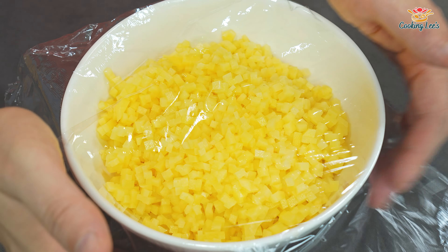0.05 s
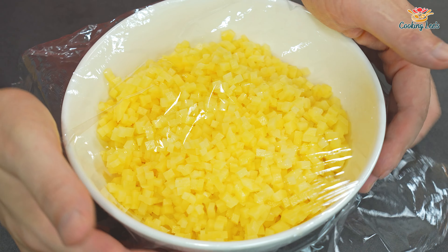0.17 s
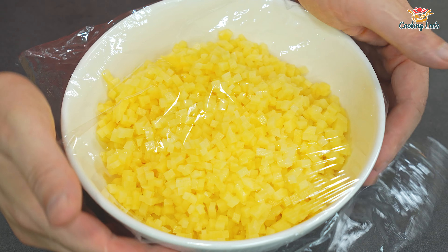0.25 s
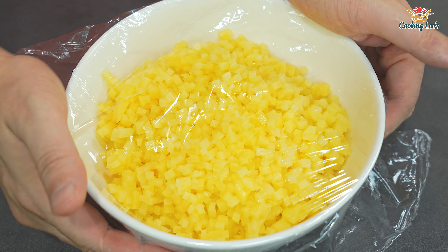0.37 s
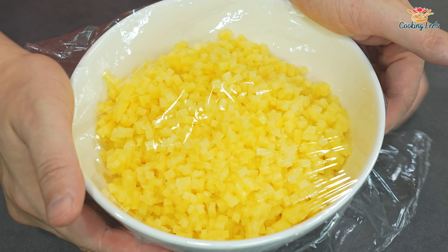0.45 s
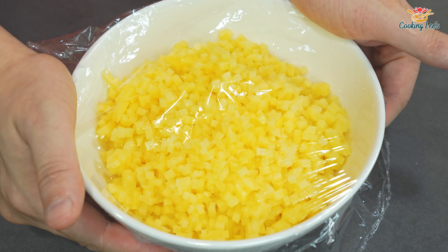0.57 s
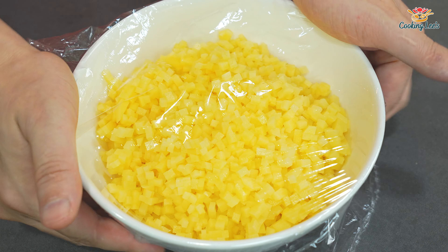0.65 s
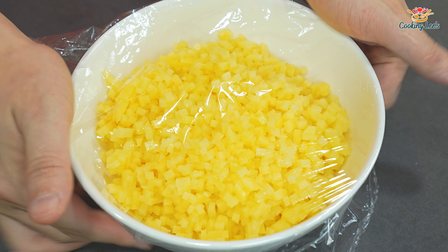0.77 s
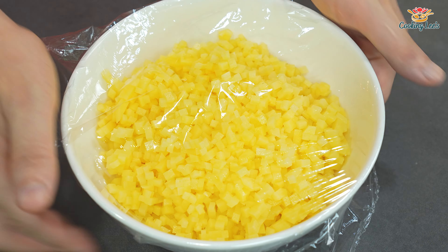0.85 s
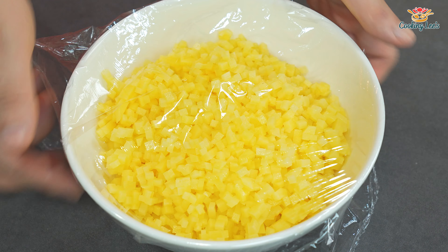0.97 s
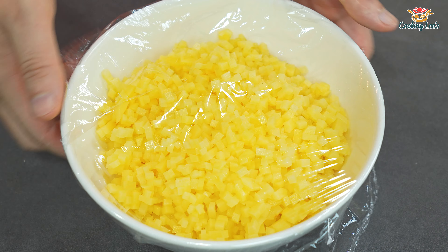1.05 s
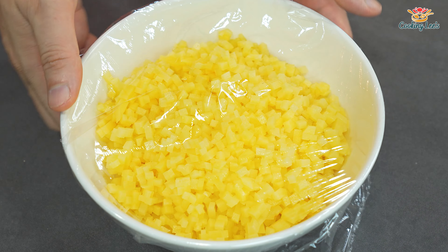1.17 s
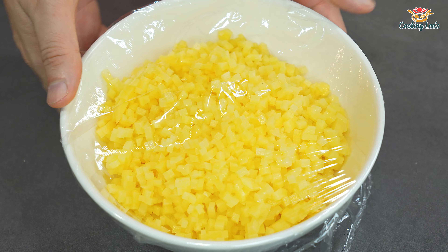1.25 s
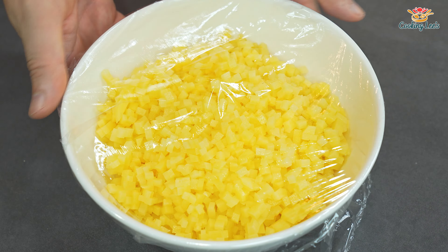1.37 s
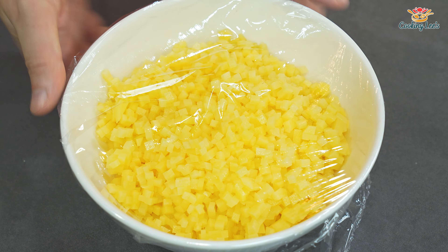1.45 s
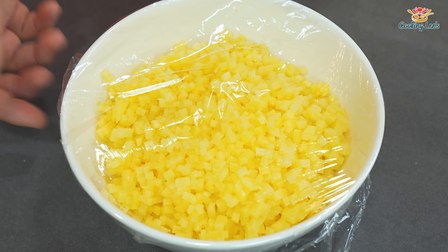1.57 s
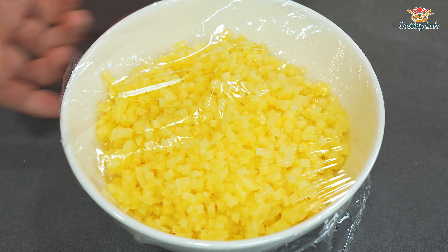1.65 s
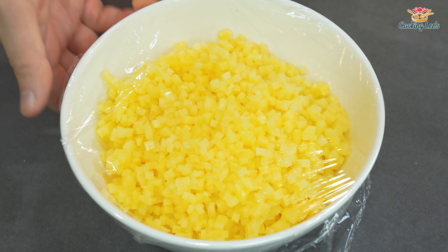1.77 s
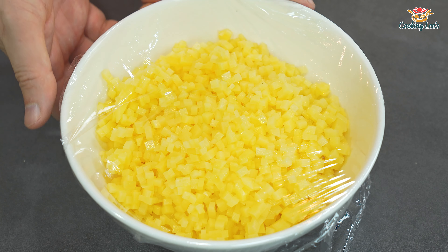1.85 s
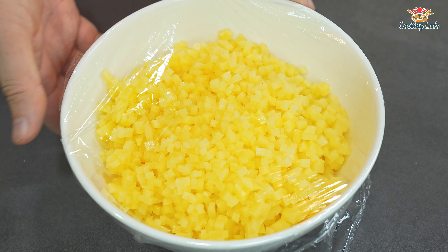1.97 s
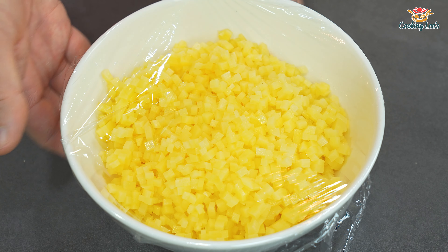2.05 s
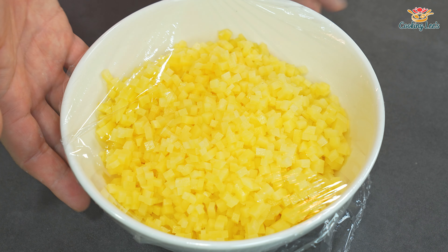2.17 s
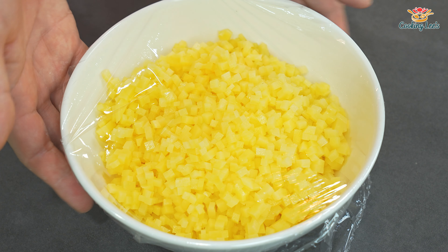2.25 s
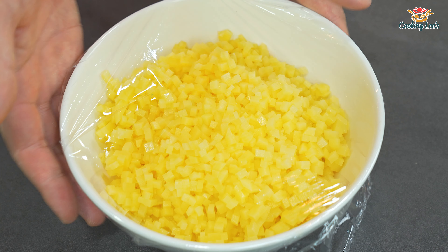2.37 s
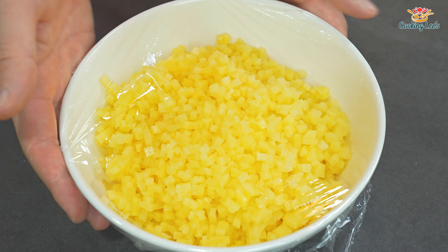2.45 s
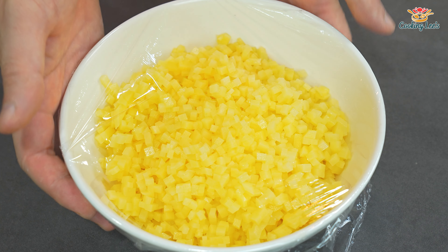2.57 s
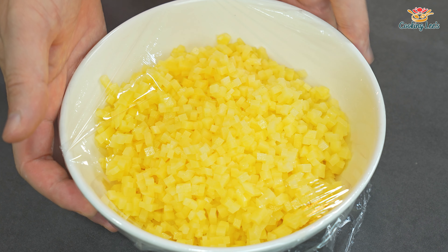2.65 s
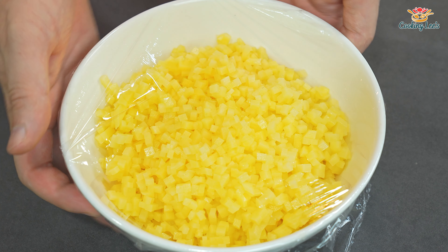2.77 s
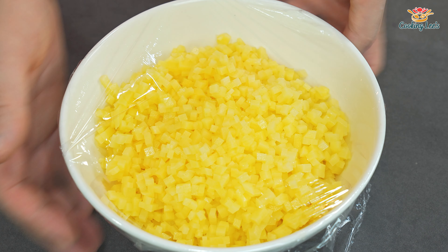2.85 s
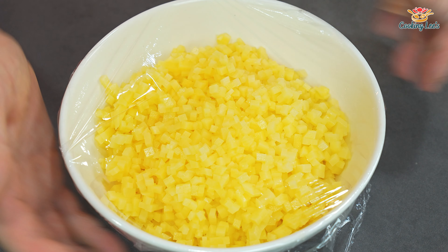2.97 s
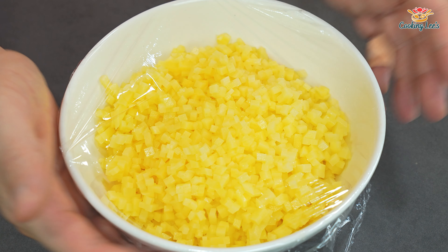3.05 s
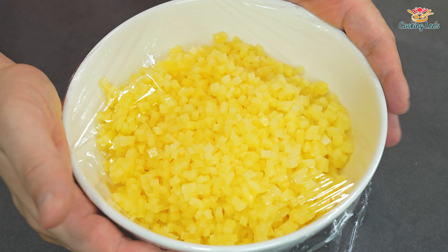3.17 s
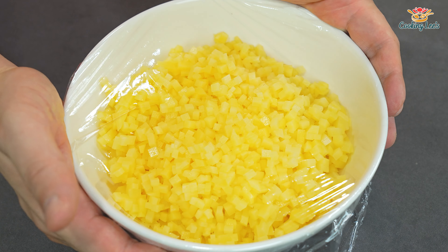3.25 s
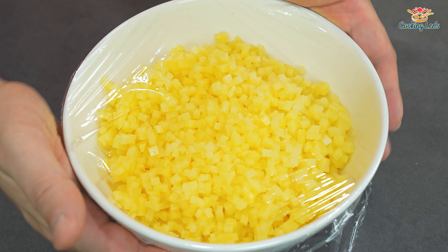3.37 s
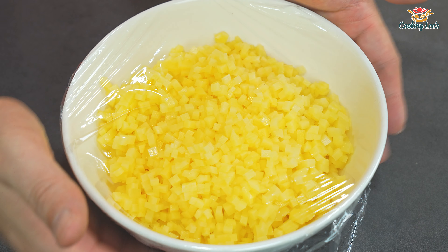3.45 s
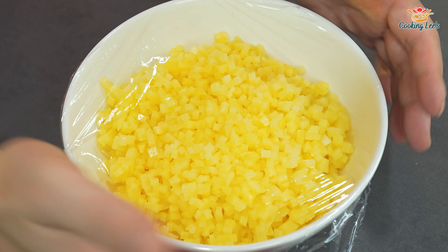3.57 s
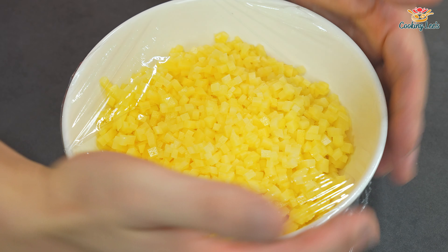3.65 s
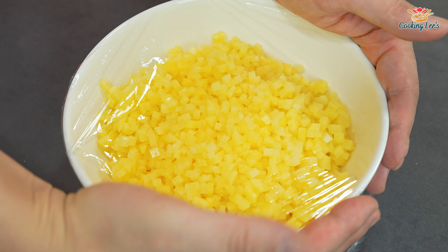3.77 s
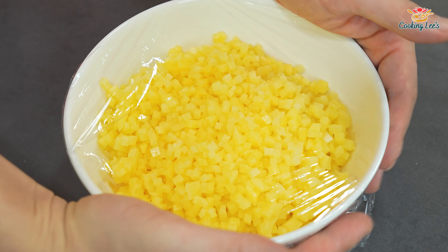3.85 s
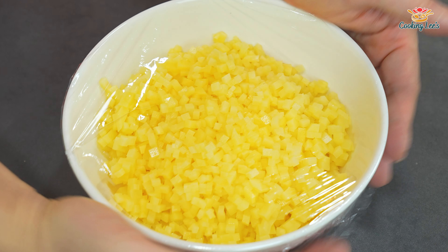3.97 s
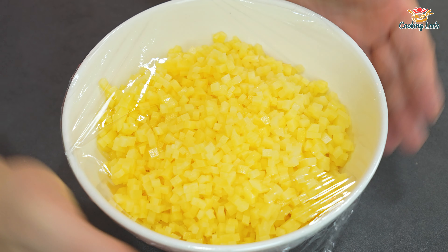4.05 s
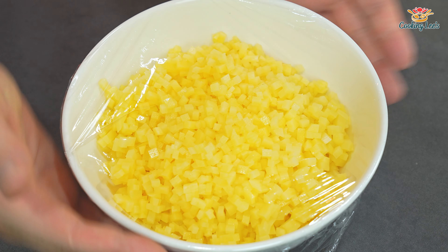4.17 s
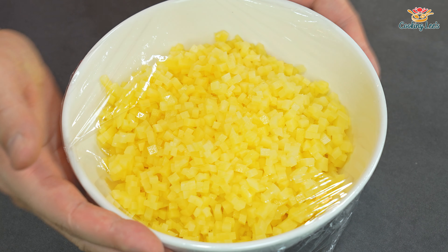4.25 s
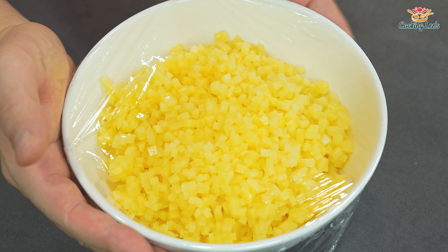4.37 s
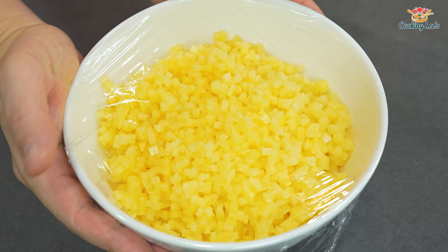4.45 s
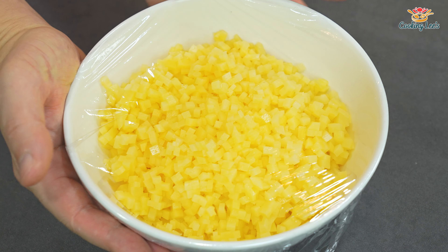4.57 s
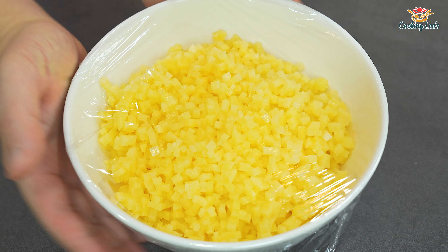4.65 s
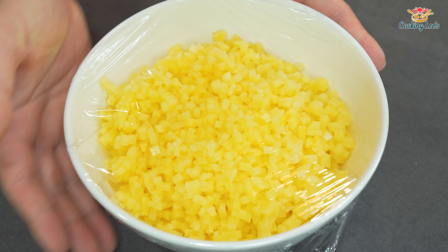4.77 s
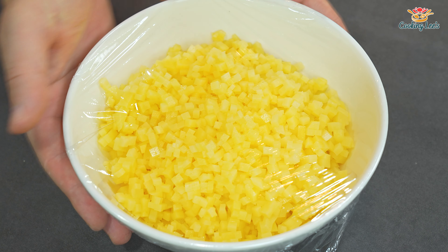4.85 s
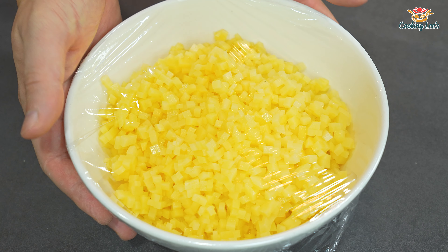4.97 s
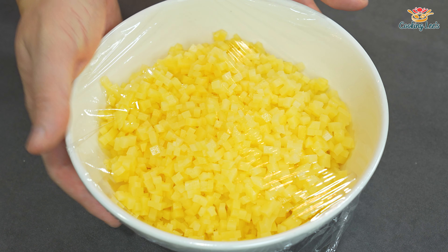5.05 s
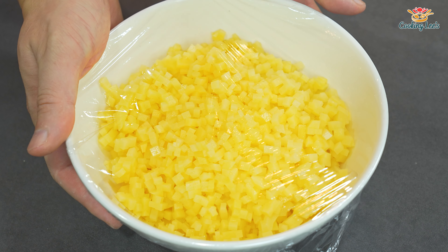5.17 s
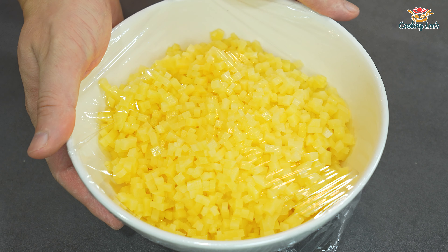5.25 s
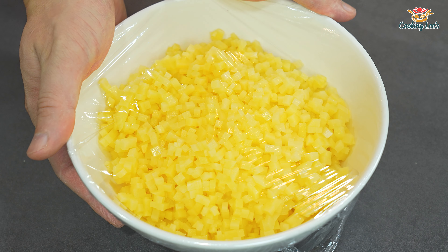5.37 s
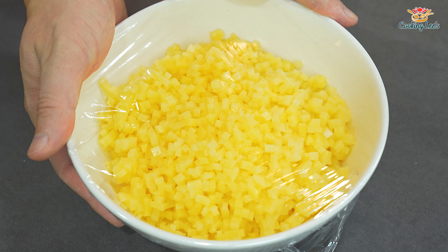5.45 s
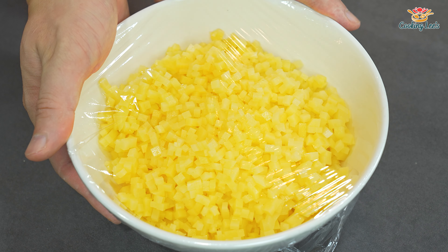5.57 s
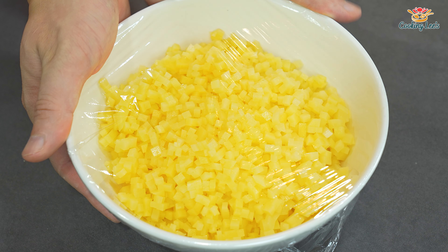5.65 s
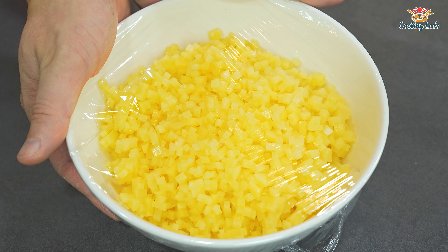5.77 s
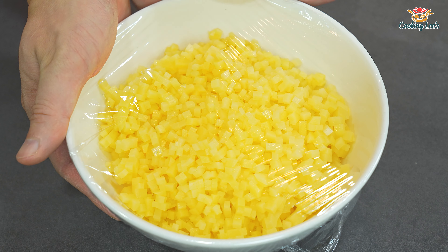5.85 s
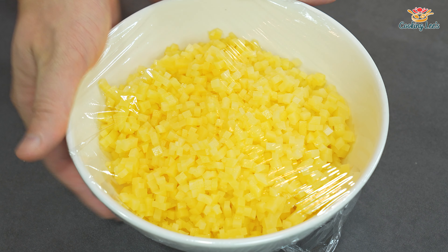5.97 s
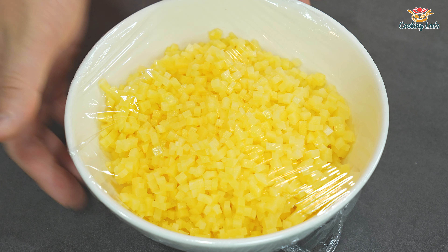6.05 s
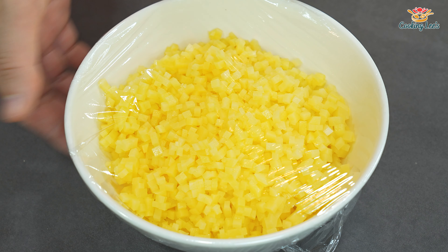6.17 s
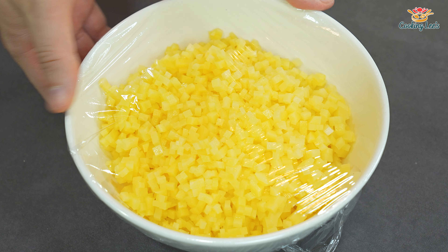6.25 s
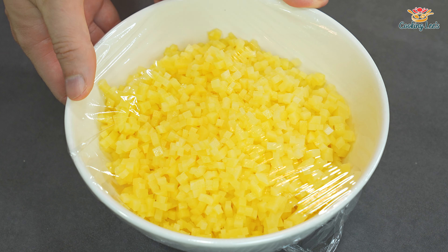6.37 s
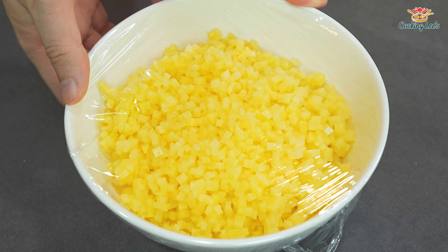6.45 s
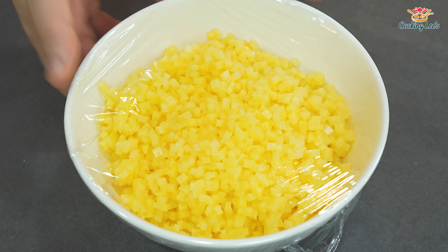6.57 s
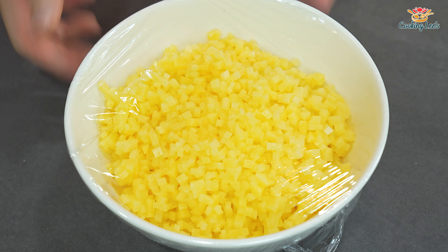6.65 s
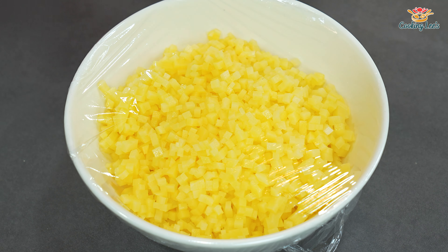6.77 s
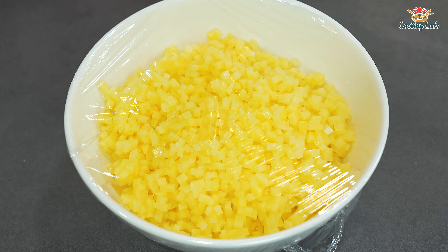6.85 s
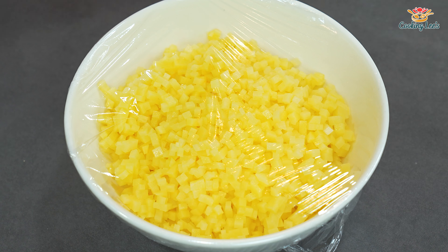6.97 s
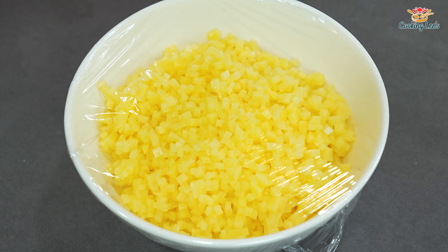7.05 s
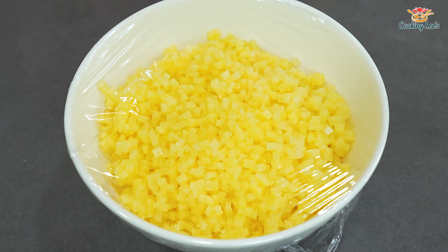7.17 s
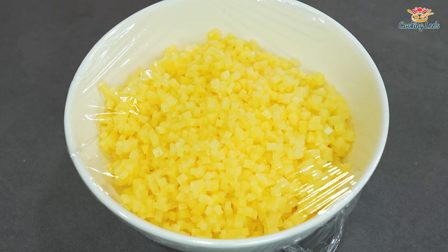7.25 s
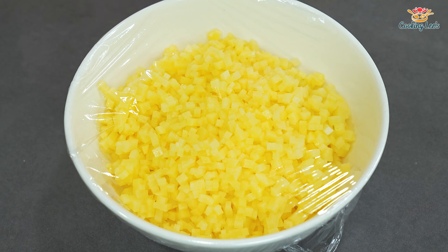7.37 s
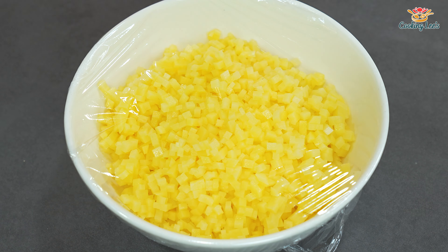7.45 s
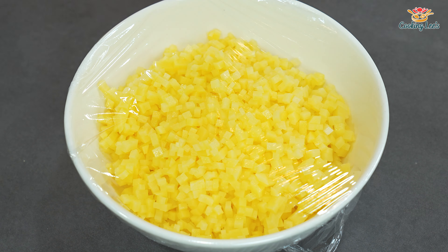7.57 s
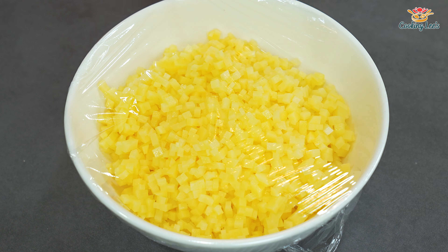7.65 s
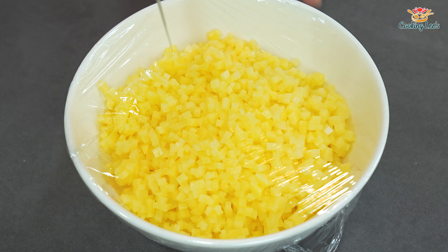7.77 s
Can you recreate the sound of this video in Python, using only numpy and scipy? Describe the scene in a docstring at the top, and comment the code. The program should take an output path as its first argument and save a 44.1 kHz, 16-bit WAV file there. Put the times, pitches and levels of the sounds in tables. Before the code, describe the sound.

A close microphone in a small room catches cling film being pressed round a ceramic bowl. From 0.1 to 0.75 seconds sharp snaps with tiny pitched rings crowd together over strong gritty rustling, while the bowl bumps and drags softly. Lighter crackles follow, with another cluster around 1.25 and a bright burst near 2.3. At about 2.45 dull thumps and a short slide shake the worktop. After a quieter stretch, a press at 2.9 and a brief one at 3.2 lead to busy, fizzy crackling from 3.4 to 4.1, with low knocks at 3.75 and 4.05. Smaller rustles and a dull crumple near 4.3 continue; crisp snaps stand out at 5.3 to 5.4 and 5.9. Soft crumpling comes at 6.1 and a last press at 6.65. Then almost nothing remains: faint hiss, thin wavering whistles after 7.25 and a trace of rustle near 7.75.

```python
"""Cling film snaps and rustles as hands press and smooth it round a ceramic bowl, close to a microphone. Snaps
are noise cracks with a short pitched ring; rustle is gritty noise through resonances of the film. Squeezed film
crumples dully; the bowl bumps and drags, shaking decaying modes of bowl and worktop. A small room answers the
snaps, and a noise suppressor darkens the quiet bands. At the end only faint hiss, brief thin tones and a little
rustle remain."""
import sys
import numpy as np
from scipy import signal
from scipy.fft import rfft, irfft, next_fast_len
from scipy.io import wavfile
from scipy.ndimage import uniform_filter1d, map_coordinates

SR = 44100
rng = np.random.default_rng(int(sys.argv[2]) if len(sys.argv) > 2 else 0)


def master(y):
    """Save y as 16-bit WAV."""
    cut = np.clip(np.atleast_2d(y).T, -1, 1)
    pcm = np.round(cut * 32767)  # scale
    wavfile.write(sys.argv[1], SR, pcm.astype(np.int16))


N = 344421


def snaps():
    """Each crease cracks, and the freed patch of film rings roughly at its own pitch while the crease runs."""
    # the loudest creases letting go, peaks before the bass cut below:
    # start_s [s], patch_db [dB peak], pitch_hz [Hz], crack_db [dB peak], length_ms [ms]
    loud_creases = [(.0941, -54, 1730, -27.5, 1.7), (.1143, -37.5, 3690, -17.5, 1.3),
                    (.1379, -13.5, 2200, -12.5, 4.4), (.1539, -15.5, 1880, -7.5, 3.4),
                    (.1852, -31.5, 1150, -17.5, 1.2), (.2129, -9, 1750, -17, 1.46),
                    (.2981, -15.5, 1940, -15.5, 1), (.3364, -13, 3220, -9.5, 0.72),
                    (.3438, -20, 2300, -17, 3.1), (.3964, -12, 2770, -9.5, 1.16),
                    (.4274, -17.5, 2200, -19, 2), (.439, -24, 3830, -21, 3), (.5818, -32, 4170, -32, 4),
                    (.5976, -29.5, 1030, -33.5, 5.3), (.6413, -22.5, 930, -31.5, 5.2),
                    (.6485, -34, 2610, -18.5, 2), (.6539, -19.5, 2040, -14, 1.6),
                    (.6879, -12.5, 2740, -13, 1.43), (.7139, -42, 2230, -19, 1.2),
                    (.7184, -31, 2380, -19, 3.6), (.7522, -28, 3430, -19, 2), (.8397, -30, 2880, -27, 1.9),
                    (.8848, -21, 1420, -29, 10.3), (.8907, -16.5, 1480, -30, 7),
                    (.9658, -28, 2460, -31, 3.7), (1.0777, -44, 2570, -28.5, 5.1),
                    (1.1496, -32, 1990, -29.5, 4.1), (1.1591, -26.5, 2370, -31.5, 1.5),
                    (1.1873, -44, 2350, -32.5, 6.3), (1.2117, -31, 2470, -22, 4.5),
                    (1.2332, -22, 2500, -30, 3.1), (1.2378, -16.5, 1500, -26, 2.2),
                    (1.25, -17, 1700, -19, 3.1), (1.2596, -12, 1330, -21, 3.2),
                    (1.298, -8, 1740, -23, 0.77), (1.4049, -29, 1540, -24.5, 1.2),
                    (1.422, -39, 1980, -33, 3.1), (1.431, -28, 1140, -36, 3.1),
                    (1.4837, -26, 2940, -27, 3.5), (1.521, -28, 3720, -44, 5.9),
                    (1.7476, -30, 1340, -44.5, 3), (1.7988, -21.5, 925, -30.5, 1.7),
                    (1.8244, -23, 2600, -42, 1.7), (1.8806, -33, 2130, -31, 1.5),
                    (1.8885, -26.5, 2380, -37, 1.5), (1.9302, -12, 2370, -20, 2.9),
                    (1.9466, -22.5, 3470, -23.5, 1.7), (2.0199, -26.5, 2440, -39, 3.4),
                    (2.0262, -22.5, 2790, -34, 1.4), (2.0413, -19.5, 1770, -30, 1),
                    (2.0749, -24, 1940, -36.5, 2.9), (2.0799, -22, 2900, -40, 1.7),
                    (2.0945, -17, 2800, -31.5, 1.4), (2.1275, -17, 3480, -19, 3.5),
                    (2.2088, -26, 3690, -26.5, 5.3), (2.2329, -22.5, 2780, -15, 6.7),
                    (2.2407, -22.5, 2830, -24.5, 1.5), (2.2749, -12, 2770, -13.5, 1.67),
                    (2.2906, -19.5, 3370, -25, 4.4), (2.3058, -25, 3370, -29, 1.2),
                    (2.4854, -32, 1220, -35, 1.6), (2.6223, -40, 3100, -32, 2.3),
                    (2.6732, -40, 1180, -28.5, 1.4), (2.7069, -33, 2770, -29, 14),
                    (2.7173, -25.5, 3200, -27, 1.5), (2.7373, -46, 3960, -29.5, 2.5),
                    (3.1886, -26, 1750, -22.5, 7.8), (3.4342, -35, 3380, -27, 3.1),
                    (3.4578, -21, 3760, -15.5, 1.1), (3.4673, -34, 4200, -15, 3),
                    (3.4983, -28.5, 1510, -33, 9.9), (3.5331, -23.5, 3500, -21.5, 2.7),
                    (3.5466, -22, 1390, -23, 3.2), (3.7141, -40, 2840, -26, 1.8),
                    (3.7284, -28, 3260, -14, 4.7), (3.7518, -26, 2400, -21, 4.1),
                    (3.8232, -20, 3400, -16.5, 2.6), (3.8351, -21.5, 3360, -25, 13),
                    (3.845, -22, 3570, -33.5, 2.5), (3.8571, -27, 3420, -34, 4.3),
                    (3.8751, -16, 2650, -17.5, 1.5), (3.9242, -34, 3100, -15.5, 6.9),
                    (3.9834, -30.5, 3790, -21.5, 12), (4.0215, -24, 2240, -16, 1.2),
                    (4.0345, -23.5, 3300, -28, 1.7), (4.325, -50, 1850, -19, 2.1),
                    (4.4249, -30, 2920, -23.5, 0.93), (4.5607, -51, 3530, -19.5, 1.7),
                    (4.6016, -33, 3500, -27, 3), (4.6182, -33, 3040, -28, 1), (4.6601, -23, 2470, -35, 1.4),
                    (4.9617, -38.5, 2610, -38, 2.5), (5.021, -33, 2940, -51, 12),
                    (5.0778, -34, 2900, -21, 3.3), (5.124, -37.5, 1550, -41, 5.2),
                    (5.2988, -20, 3420, -25.5, 1.1), (5.3032, -9, 3320, -17, 1.7),
                    (5.3109, -16, 3840, -27, 0.62), (5.3485, -15, 3660, -32, 1.3),
                    (5.3533, -18, 1870, -23.5, 1.7), (5.4183, -15, 1590, -13, 1.2),
                    (5.5676, -45, 2170, -42, 2.5), (5.5914, -32, 1700, -32, 0.78),
                    (5.6572, -37, 2600, -37, 3.8), (5.6653, -32.5, 2310, -30.5, 3.4),
                    (5.8902, -23, 2050, -20, 1.3), (5.9055, -22.5, 1880, -36, 0.61),
                    (5.911, -22.5, 2300, -31, 1.1), (5.9203, -17.5, 2100, -17, 1.2),
                    (6.0141, -34, 1970, -27.5, 3.9), (6.2698, -37, 2470, -26.5, 1.5),
                    (6.2876, -37, 2930, -32, 2.4), (6.3885, -25.5, 1660, -26.5, 1.9),
                    (6.5577, -43.5, 3000, -35.5, 2.2), (6.607, -38.5, 1620, -30, 1.5),
                    (6.6378, -25, 1490, -32, 1.7), (6.658, -32, 2000, -34, 1.4)]
    creases = list(loud_creases) + small_creases(count=130)
    out = np.zeros(N + SR)
    t = np.arange(SR // 20) / SR
    draws = rng.standard_normal((len(creases), 2, len(t)))
    for crease, (patch_noise, crack_noise) in zip(creases, draws):
        start_s, patch_db, pitch_hz, crack_db, length_ms = crease
        u = t / (max(length_ms, .4) * 0.00038)  # the swell peaks at 0.38 of the length
        fade = u * np.exp(1 - u)
        patch = signal.lfilter(*signal.iirpeak(pitch_hz, 2.8 + 0.45 * length_ms, SR), patch_noise)
        ring = fade * (0.66 * unit(patch) + .5 * np.sin(2 * np.pi * pitch_hz * t))
        crack = fade ** 2.3 * signal.lfilter(*signal.butter(2, 5000, "high", fs=SR), crack_noise)
        burst = amp(patch_db) * ring / np.abs(ring).max()
        burst += amp(crack_db) * crack / np.abs(crack).max()
        out[round(start_s * SR):][:len(t)] += burst
    return filtered(out[:N], lambda hz: hz ** 4 / (hz ** 4 + 650 ** 4))  # a small patch radiates no bass


def small_creases(count):
    """Lesser creases at chance moments, their strength scattered about the rustle around them."""
    over_rustle_db, scatter_db = 8.5, 4
    middle_hz, log_spread, length_ms = 2500, 0.24, 1.3
    loose, tight = handling()[:2]
    when = rng.uniform(0, N - 1, count).astype(int)
    chance = rng.standard_normal((count, 3))
    rustle_db = 20 * np.log10(np.hypot(loose, tight)[when])
    patch_db = rustle_db + over_rustle_db + scatter_db * chance[:, 0]
    crack_db = patch_db + scatter_db * chance[:, 1]
    pitch_hz = middle_hz * np.exp(log_spread * chance[:, 2])
    return list(zip(when / SR, patch_db, pitch_hz, crack_db, np.full(count, length_ms)))


def rustle():
    """Countless small creases: loose and stretched patches, fine peeling and the air trapped under the film."""
    # resonances of loose patches: pitch_hz [Hz], width_hz [Hz], level_db [dB, relative]
    slack = [(1406, 330, 1), (1504, 220, 2), (1926, 220, 3), (2235, 260, 1.5)]
    # resonances of stretched patches: pitch_hz [Hz], width_hz [Hz], level_db [dB, relative]
    taut = [(2446, 360, 2.5), (2929, 230, 3.5), (3314, 350, 5), (3620, 160, 5.5), (3970, 300, 2.5),
            (4850, 890, -2)]
    # resonances of air under the film: pitch_hz [Hz], width_hz [Hz], level_db [dB, relative]
    hollow = [(480, 150, -22.5), (633, 80, -12), (804, 110, -2), (901, 70, 6), (1033.7, 92, 7.5)]
    # spectrum of fine peeling: freq_hz [Hz], density_db [dB per Hz, relative]
    peeling = [(2350, -63.5), (4000, -5.5), (6740, 0), (7370, -1), (12300, -1), (14800, -1), (16000, -16.5),
               (16500, -36)]
    loose, tight, treble, air = handling()
    strongest = np.maximum(np.hypot(loose, tight), treble)
    busy = np.clip((20 * np.log10(strongest) + 79) / 35, 0, 1)  # faint rustle is distant, hence smooth
    slips = grit(spiky_db=1.1 * busy, clump_db=3.1 * busy)
    body = loose * unit(filtered(slips, modes(slack))) + tight * unit(filtered(slips, modes(taut)))
    fizz = treble * unit(filtered(slips, lambda hz: amp(along(peeling, hz))))
    low = air * unit(filtered(slips, modes(hollow)))
    narrow = shifting(body + low, depth_db=3.5, size=(3, 8))
    return shifting(narrow + fizz, depth_db=1.5, size=(30, 3))


def handling():
    """Gains of loose patches, stretched patches, peeling and trapped air: each press, then its slow settling."""
    # presses of a palm on the film, levels before the shifting resonances:
    # peak_s [s], rustle_db [dB rms], tightness_db [dB, stretched over loose patches], treble_db [dB rms],
    # low_db [dB rms], rise_s [s per 20 dB], fall_s [s per 20 dB]
    presses = [(.05, -59, -4.5, -54.5, -56, .04, 0.076), (.15, -33, 4, -40.5, -37.5, .035, 0.16),
               (.313, -27.5, 8.5, -31.5, -40.5, .09, 0.14), (.44, -42.5, 4, -46.5, -45, 0.16, 0.23),
               (.657, -38.5, 8, -42.5, -46.5, 0.026, 0.32), (.978, -47, 13, -53.5, -71, 0.074, .06),
               (1.159, -43, 0, -43.5, -57.5, .07, 0.1), (1.253, -45.5, 15, -54.5, -47, .06, 0.47),
               (1.427, -39.5, -1.5, -46, -48.5, 0.1, 0.028), (1.523, -44, -4.5, -50.5, -79, .1, 0.046),
               (1.735, -48, 1, -56.5, -50.5, 0.014, .2), (1.79, -35.5, -2, -42.5, -42.5, 0.052, 0.084),
               (1.934, -42.5, -4, -46.5, -48.5, .13, 0.12), (2.127, -39, 2.5, -42, -47, .22, 0.1),
               (2.285, -29, 10, -31.5, -57, 0.021, 0.036), (2.35, -49.5, 4, -52.5, -64.5, .05, 0.28),
               (2.482, -49, 10, -49.5, -49.5, 0.078, 0.16), (2.718, -52, 8, -49, -71, 0.1, 0.26),
               (2.903, -37.5, 2, -43, -54, .05, 0.087), (3.195, -35.5, 7, -36.5, -36, .035, 0.029),
               (3.24, -50, 6, -47.5, -53.5, .05, 0.16), (3.39, -52, 7, -37.5, -60, .025, 0.14),
               (3.44, -46, 12, -35.5, -58, .07, 0.069), (3.506, -39.5, 2, -44.5, -47.5, 0.11, 0.047),
               (3.755, -37.5, 4.5, -35, -44.5, 0.041, 0.06), (3.835, -34, 5, -40.5, -44.5, 0.03, 0.15),
               (3.937, -32, 2, -30.5, -38.5, 0.047, 0.024), (4.03, -39, 15, -41, -54, 0.088, 0.093),
               (4.09, -31, -1, -59, -38.5, 0.13, 0.04), (4.13, -49, 0.5, -73.5, -51, .04, 0.16),
               (4.32, -44.5, 4.5, -42.5, -56.5, 0.078, 0.11), (4.434, -41, 11, -47.5, -59, .055, 0.1),
               (4.49, -48, 12, -44.5, -66, .1, 0.057), (4.665, -41, 7.5, -45.5, -50, 0.083, 0.038),
               (4.767, -45.5, 1.5, -48, -59.5, 0.23, 0.11), (4.913, -51, 6, -47.5, -56.5, 0.052, 0.083),
               (5.027, -48, 9, -54, -57.5, .035, 0.043), (5.088, -49.5, 13, -49.5, -69, 0.051, 0.2),
               (5.303, -37.5, 8, -46, -80, 0.028, 0.16), (5.35, -34.5, 3.5, -51, -46, 0.031, 0.052),
               (5.428, -43, 7, -49, -52, .08, 0.2), (5.669, -51.5, 6, -49.5, -86, 0.039, .2),
               (5.895, -35, 4.5, -43, -49.5, .02, 0.11), (6.082, -37, -3.5, -47.5, -42, 0.094, 0.069),
               (6.21, -50.5, 9, -49.5, -58.5, 0.055, 0.13), (6.275, -50, 12, -44.5, -74.5, 0.083, 0.15),
               (6.4, -60.5, 5, -54, -66, 0.047, 0.14), (6.647, -38, -5, -43.5, -45, 0.064, 0.064),
               (6.9, -99, 0.5, -72, -99, .1, .9), (7.75, -72, -2, -71.5, -77, 0.11, .6)]
    settle_db, settle_treble_db = -22, 7  # the released film creeps on: under its press, extra treble
    settle_s = .3  # s per 20 dB
    peak_s, body_db, tight_db, treble_db, low_db, rise_s, fall_s = np.transpose(presses)
    tight_share = 1 / (1 + amp(-2 * tight_db))
    loose_level_db = body_db + 10 * np.log10(1 - tight_share)
    tight_level_db = body_db + 10 * np.log10(tight_share)
    levels_db = np.array([loose_level_db, tight_level_db, treble_db, low_db])
    after_db = levels_db + settle_db + np.array([[0], [0], [settle_treble_db], [0]])
    press = swells(peak_s, levels_db, rise_s[:, None], fall_s)
    settling = swells(peak_s, after_db, rise_s[:, None], settle_s + 0 * peak_s)
    return np.sqrt(press + settling + 1e-12)


def shifting(x, depth_db, size):
    """Resonances come and go as the sheet changes shape: random gains, size = (bins wide, frames long)."""
    spectrum = signal.stft(x, nperseg=1024)[2]
    field = uniform_filter1d(rng.standard_normal(spectrum.shape), size=size[0], axis=0)
    field = uniform_filter1d(field, size=size[1], axis=1)
    return signal.istft(spectrum * amp(depth_db * unit(field)), nperseg=1024)[1][:N]


def grit(spiky_db, clump_db):
    """Tiny slips, one a sample: a few far larger than the rest, in clumps, with the slower level evened out."""
    clumps = 0.6 * wobble(90) + wobble(350)
    size = amp(spiky_db * rng.exponential(size=N) + clump_db * clumps)
    slips = size * rng.standard_normal(N)
    return slips / np.sqrt(np.abs(uniform_filter1d(slips ** 2, size=2048)))


def squeezes():
    """A fistful of loose film squeezed against the bowl: dull crumpling, deeper than the stretched sheet."""
    # squeezes: peak_s [s], level_db [dB rms], rise_s [s per 20 dB], fall_s [s per 20 dB]
    grips = [(.34, -50.5, 0.092, 0.16), (1.3, -52, .04, .06), (2.475, -48, .04, 0.057),
             (3.76, -55.5, 0.028, .06), (4.09, -55, 0.062, 0.044), (4.295, -47.5, 0.013, 0.073),
             (5.9, -53.5, 0.017, .08), (6.08, -47.5, 0.058, .09), (6.64, -56, .04, 0.085)]
    # pockets of air in the fistful: pitch_hz [Hz], width_hz [Hz], level_db [dB, relative]
    pockets = [(430, 130, -5), (560, 150, 1), (700, 160, 3.5)]
    peak_s, level_db, rise_s, fall_s = np.transpose(grips)
    gain = np.sqrt(swells(peak_s, level_db[None], rise_s[:, None], fall_s)[0])
    return gain * unit(filtered(grit(spiky_db=1.5, clump_db=2.5), modes(pockets)))


def bowl():
    """Blows and a dragging foot shake the worktop's modes; the blows also ring the bowl's own."""
    # the foot meets the worktop, levels before the trims in the loop:
    # start_s [s], lower_db [dB], upper_db [dB], ceramic_db [dB]
    bumps = [(0.133, -43, -69, -47.5), (0.205, -38, -69, -41), (0.29, -46, -56, -54.5),
             (0.389, -35, -39, -43), (0.653, -42.5, -36, -40), (0.687, -47, -32.5, -41),
             (1.294, -69, -64, -43), (1.482, -44.5, -37, -74), (1.784, -51, -33, -28.5),
             (1.792, -49, -58, -36.5), (1.864, -54, -36, -40.5), (2.412, -24.5, -34.5, -66),
             (2.463, -45, -23, -41.5), (2.488, -33, -30, -64), (2.577, -45, -40, -67),
             (2.798, -46, -71, -104), (3.149, -61, -50, -50), (3.185, -39, -43, -43.5),
             (3.382, -36.5, -66, -78), (3.421, -33, -45.5, -74), (3.742, -26.5, -69, -41),
             (3.896, -36, -55, -42), (4.059, -27.5, -62, -33), (4.293, -54, -27.5, -55),
             (4.345, -56, -42, -68), (4.579, -42.5, -63, -98), (4.705, -45.5, -80, -60),
             (4.912, -48, -92, -97), (5.011, -78, -78, -68), (5.107, -70, -52.5, -79),
             (5.818, -34.5, -77, -87.5), (5.892, -43, -58, -38.5), (6.599, -60, -59, -56)]
    # the foot slides: start_s [s], stop_s [s], lower_db [dB rms], upper_db [dB rms],
    # slowing_s [s per 20 dB; sign ignored, 0 = silent straight after the start]
    slides = [(0.122, .2, -53, -67, 0), (0.214, .42, -55, -65.5, 1.5), (0.422, .64, -52, -64, 0.1),
              (0.652, .93, -45.5, -48.5, 0.26), (1.293, 1.418, -67.5, -72, -5),
              (1.484, 1.61, -58, -52, 0.5), (1.784, 1.816, -42, -31, -0.5), (1.82, 2.15, -55.5, -48.5, .4),
              (2.22, 2.31, -72, -78, 0), (2.407, 2.47, -44.5, -59.5, 4), (2.46, 2.557, -40, -33.5, 0.1),
              (2.547, 2.772, -57, -55, 0.5), (2.79, 2.953, -63, -70, .25), (3.151, 3.198, -69, -51, -0.5),
              (3.187, 3.397, -54, -59.5, 0.3), (3.38, 3.72, -50, -59.5, 0.33),
              (3.744, 3.826, -35, -43.5, 0.2), (3.797, 4.023, -46, -57, 0), (3.914, 3.972, -62, -45, -1.5),
              (4.042, 4.28, -46.5, -56.5, .2), (4.288, 4.378, -54.5, -43.5, 0.4),
              (4.362, 4.562, -65, -61.5, 2), (4.584, 4.86, -55.5, -65, -0.05),
              (4.895, 5.01, -63, -95, -0.3), (4.995, 5.052, -83, -65.5, 4), (5.077, 5.216, -67.5, -64, 0),
              (5.825, 5.966, -50.5, -73, 0.2), (5.887, 6.077, -54, -58, 0.26), (5.993, 6.076, -65, -83, 1),
              (6.335, 6.42, -99, -77, 1.5), (6.604, 6.67, -49.5, -57, 0.2),
              (6.675, 6.818, -67.5, -72.5, 0.4)]
    # lower worktop modes: pitch_hz [Hz], width_hz [Hz], level_db [dB, relative]
    lower_modes = [(76.4, 12, -2), (121, 32, -3.5), (140.3, 39, 11), (190, 59, -20.5)]
    # upper worktop modes: pitch_hz [Hz], width_hz [Hz], level_db [dB, relative]
    upper_modes = [(272, 30, -15.5), (296, 41, 9), (353, 12, -7), (430, 25, -9), (508, 74, -14)]
    # modes of the bowl, damped by food: pitch_hz [Hz], width_hz [Hz], level_db [dB, relative]
    ceramic_modes = [(598, 30, -12), (748, 16, 0)]
    out = np.zeros(N + SR)
    for start_s, lower_db, upper_db, ceramic_db in bumps:
        blow = knock(lower_db + 1.0, lower_modes, soft_ms=12.0)
        blow += knock(upper_db - 4, upper_modes, soft_ms=4.8)
        blow += knock(ceramic_db + 2.5, ceramic_modes, soft_ms=16.0)
        out[round(start_s * SR):][:SR // 4] += blow
    start_s, stop_s, *levels_db, slowing_s = np.transpose(slides)
    rise_s = .007  # s per 20 dB
    slow, quick = np.sqrt(swells(start_s, np.array(levels_db), rise_s, slowing_s, stop_s[:, None]))
    lower = slow * unit(filtered(grit(spiky_db=1.0, clump_db=0.5), modes(lower_modes)))
    upper = quick * unit(filtered(grit(spiky_db=2.3, clump_db=0.7), modes(upper_modes)))
    return lower + upper + out[:N]


def knock(db, table, soft_ms):
    """A soft blow: every mode starts together, at new strengths, and dies as its width demands."""
    t = np.arange(SR // 4) / SR
    ring = np.zeros(len(t))
    for pitch_hz, width_hz, level_db in table:
        strength = amp(level_db + rng.normal(0, 1.5))
        ring += strength * np.exp(-np.pi * width_hz * t) * np.sin(2 * np.pi * pitch_hz * t)
    return amp(db) * ring * (1 - np.exp(-(t / (soft_ms / 1000)) ** 2))


def swells(peaks, levels_db, rises, falls, stops=np.inf):
    """Power of swells that rise and fall evenly in dB, cut short at their stops; one row for each layer."""
    grip_s = .035  # s per 20 dB: the extra fall once the foot grips again
    now = np.arange(0, N + 64, 64) / SR
    t = now - peaks[:, None]
    drop = np.where(t < 0, -t / np.abs(rises), t / np.abs(falls)[:, None])  # in steps of 20 dB
    drop = drop + np.maximum(now - stops, 0) / grip_s
    power = amp(2 * levels_db) @ amp(-2 * 20 * drop)
    return np.array([np.interp(np.arange(N) / 64, np.arange(len(p)), p) for p in power])


def thin_tones():
    """Faint unsteady sine tones that swell and fade away."""
    # brief thin tones: start_s [s], fade_start_s [s], pitch_hz [Hz], level_db [dB, before the trim and wobble
    # below]
    tones = [(7.253, 7.373, 3240, -66.5), (7.294, 7.45, 3420, -75), (7.298, 7.368, 3580, -64.5),
             (7.494, 7.56, 3040, -75), (7.52, 7.57, 5450, -81.5), (7.691, 7.815, 1408, -59.5),
             (7.743, 7.79, 1656, -66), (7.719, 7.81, 1900, -77), (7.765, 7.81, 3300, -80),
             (3.59, 3.74, 3250, -54), (3.6, 3.7, 2630, -59)]
    t, out = np.arange(N) / SR, np.zeros(N)
    for start_s, fade_start_s, pitch_hz, level_db in tones:
        fade = amp(-60 * np.maximum(t - fade_start_s, 0) / 0.12)
        gate = np.clip((t - start_s) / 0.011, 0, 1) * fade
        level = amp(level_db - 2 + 4.1 * wobble(60))
        out += level * gate * np.sin(2 * np.pi * pitch_hz * t + 0.55 * wobble(110))
    return out


def room(x):
    """Noise tail in which each frequency dies at its own speed; drawn anew each 1/4 s, as the hands move."""
    # decay of the room: freq_hz [Hz], t60_s [s per 60 dB]
    decay = [(500, 0.1), (3000, 0.55), (12000, 0.24)]
    out, step = np.zeros(N + SR), SR // 4
    for start in range(0, N, step):
        hz, t, z = signal.stft(rng.standard_normal(SR // 2), SR, nperseg=256)
        fade = amp(-60 * t / along(decay, hz)[:, None])
        tail = signal.istft(z * fade, SR, nperseg=256)[1]
        wet = signal.fftconvolve(x[start:start + step], tail / np.linalg.norm(tail))
        out[start + 100:][:len(wet)] += wet  # 100 samples of pre-delay
    return out[:N]


def suppress(x):
    """Noise suppressor: each narrow band is turned down while its recent level is near the expected hiss."""
    # what the suppressor takes for noise: freq_hz [Hz], level_db [dB, relative to threshold_db]
    expected_hiss = [(30, -21), (300, -11.5), (550, 15), (1000, -3.5), (1200, 6.5), (1500, -4),
                     (3800, -3.5), (5500, -32.5), (9200, -5.5), (11000, -12.5), (16000, -9.5)]
    threshold_db = -88.5  # a band at threshold plus expected hiss is halved
    hz, _, z = signal.stft(x, SR, nperseg=1024)
    recent = uniform_filter1d(np.abs(z) ** 2, size=9, axis=-1, origin=3)  # mostly past frames
    noise = amp(2 * (threshold_db + along(expected_hiss, hz)))[:, None]
    gain = recent ** 3 / (recent ** 3 + noise ** 3)
    return signal.istft(z * gain, SR, nperseg=1024)[1][..., :N]


def amp(db):
    """Gain of a level in dB."""
    return 10 ** (np.asarray(db) / 20)


def unit(x):
    """x at rms 1."""
    return x / np.sqrt(np.mean(x ** 2) + 1e-20)


def along(points, hz):
    """Value at hz, read between (Hz, value) points on a log frequency axis."""
    f, v = np.transpose(points)
    return np.interp(np.log(hz + 1), np.log(f + 1), v)


def wobble(rate):
    """A smooth random curve, rate knots a second."""
    return map_coordinates(rng.standard_normal(int(N * rate / SR) + 4), [np.arange(N) * rate / SR])


def filtered(x, response):
    """x shaped by a complex response of frequency."""
    m = next_fast_len(N + SR // 2)
    return irfft(rfft(x, m) * response(np.fft.rfftfreq(m, 1 / SR)), m)[..., :N]


def modes(table):
    """Response of (Hz, width Hz, dB) resonances; squared, so that the valleys between them are deep."""
    return lambda f: sum(amp(db) * (f * w / (c * c - f * f + 1j * f * w)) ** 2 for c, w, db in table)


def scene():
    """Film, bowl and thin tones, with the snaps answered by worktop and room."""
    cracks = snaps()
    # bounce off the worktop, 1.3 ms late
    bounce = filtered(cracks, lambda hz: amp(-20.5) * np.exp(-2j * np.pi * hz * .0013))
    answered = cracks + bounce + amp(-10) * room(cracks)
    return (answered + rustle() + squeezes() + bowl() + thin_tones())[None]


def record(dry):
    """The microphone's bass cut, the suppressor, the faint hush left behind it, and the band limit."""
    # spectrum of the hush: freq_hz [Hz], density_db [dB per Hz, relative]
    hush_spectrum = [(18, -48), (30, -13.5), (319, -10), (540, -19), (702, -19.5), (1100, -21.5),
                     (16000, -28.5)]
    hush_db, top_hz = -89.5, 16000
    heard = filtered(dry, lambda hz: (1j * hz / (1j * hz + 45)) ** 3)
    hush_noise = filtered(rng.standard_normal(N), lambda hz: amp(along(hush_spectrum, hz)))
    hush = amp(hush_db) * unit(hush_noise)
    return filtered(suppress(heard) + hush, lambda hz: np.clip((top_hz + 150 - hz) / 300, 0, 1) ** 2)


dry = scene()
out = record(dry)
master(out)
```